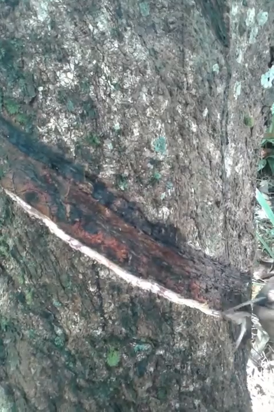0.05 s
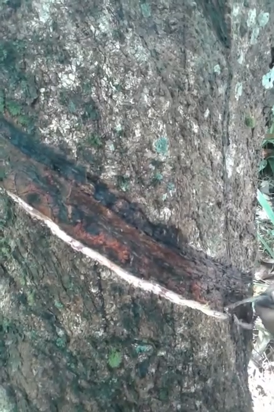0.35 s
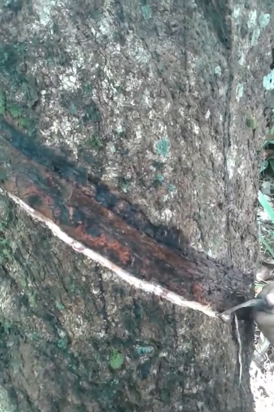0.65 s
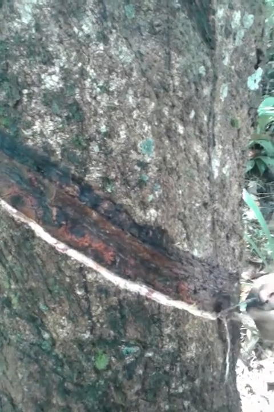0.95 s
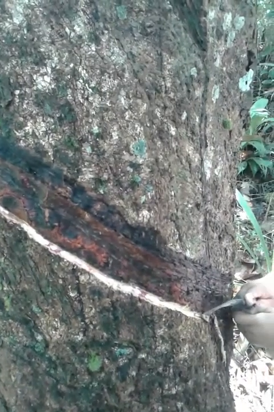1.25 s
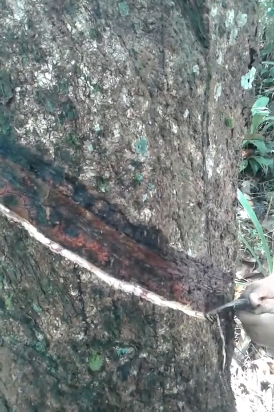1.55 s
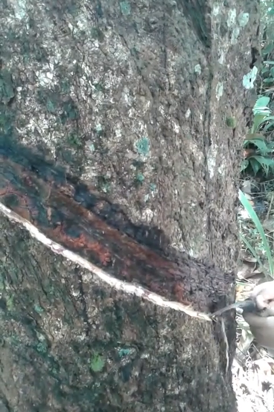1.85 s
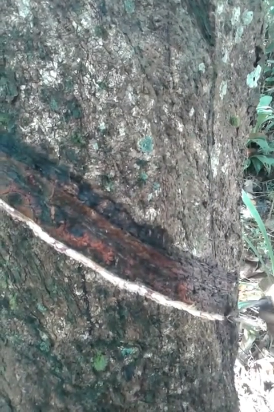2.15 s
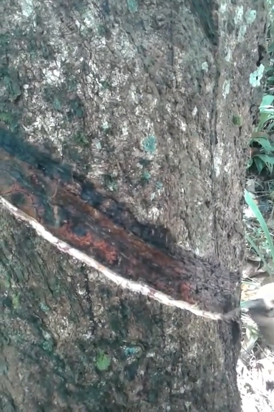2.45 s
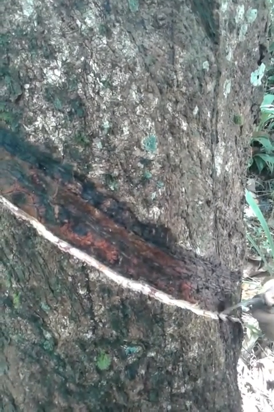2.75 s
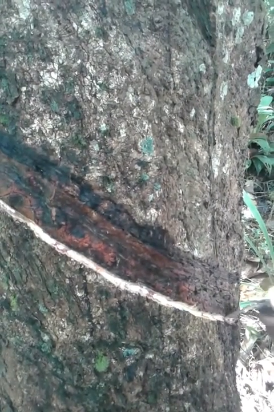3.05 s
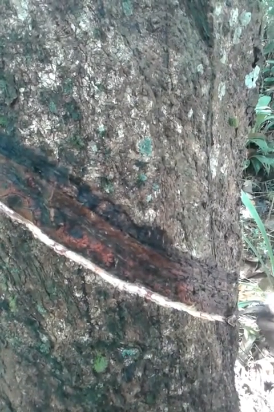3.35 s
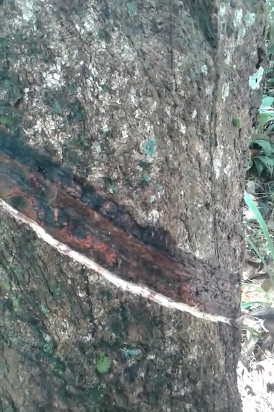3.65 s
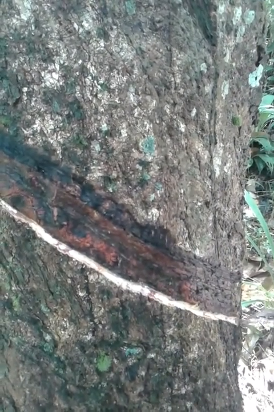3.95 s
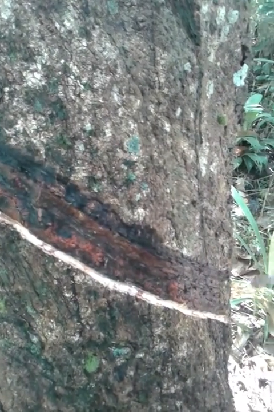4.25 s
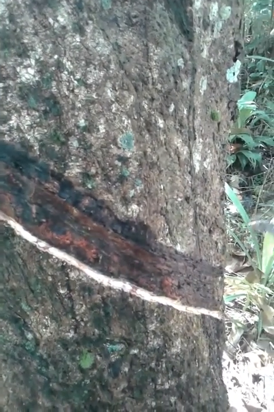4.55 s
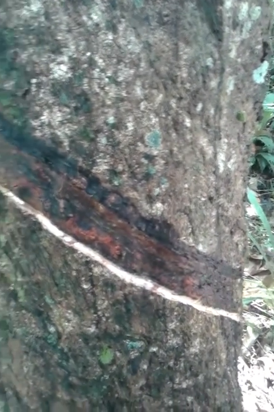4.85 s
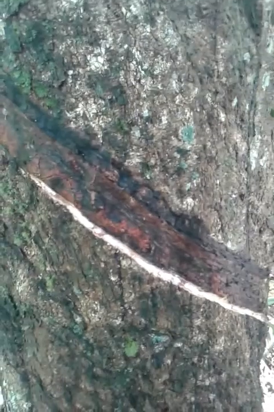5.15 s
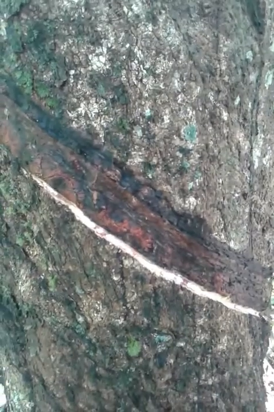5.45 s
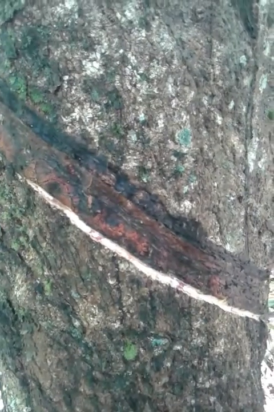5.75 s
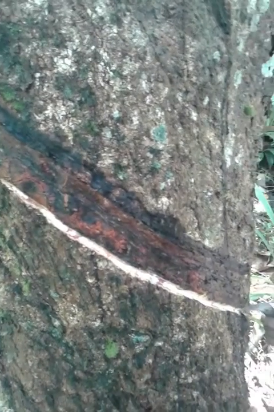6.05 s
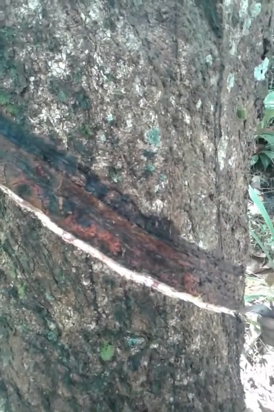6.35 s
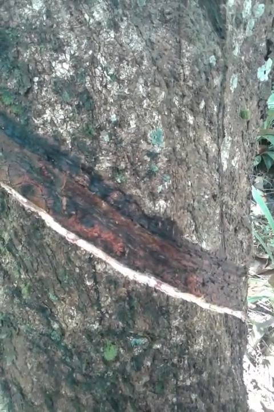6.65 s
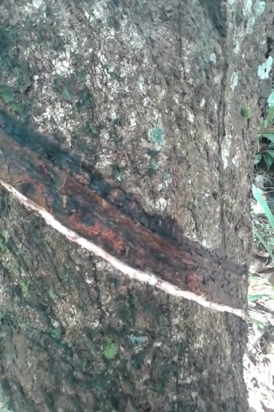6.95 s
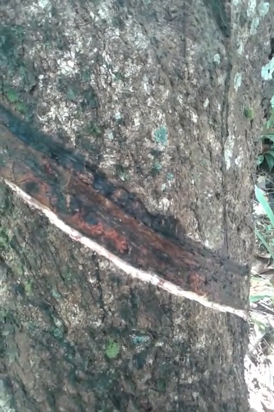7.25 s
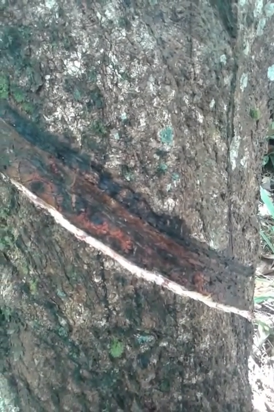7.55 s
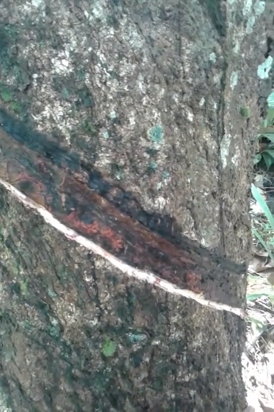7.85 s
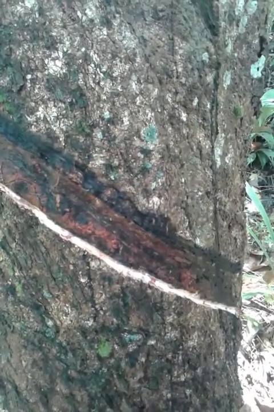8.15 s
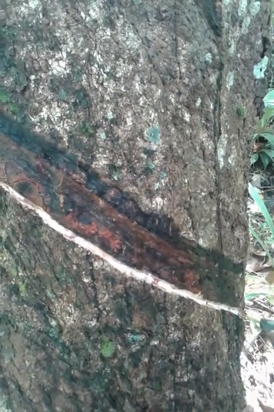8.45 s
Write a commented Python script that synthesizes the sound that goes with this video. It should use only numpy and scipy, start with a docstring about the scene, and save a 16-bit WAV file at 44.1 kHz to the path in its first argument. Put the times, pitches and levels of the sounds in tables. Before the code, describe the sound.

In the woods, a high cicada buzz runs behind the close sound of a knife cutting into bark. Quick, irregular scrapes and sharp little clicks follow each other for about four seconds, stop, then resume for a few more strokes. Dry leaves crackle briefly, a nearer insect trills twice, and tiny chirps and a distant whistled note come and go.

```python
"""In the woods, microphone close to a tree. Cicadas buzz over a low rush of air; a far whistler
repeats a falling note. Almost at once a hooked knife starts shaving a groove in the bark, each short
stroke a run of tiny fibre breaks that ring the blade. Chips snap off, something small chirps, feet shift
in dry leaves. An insect trills at about 1 s and again at 5 s; now and then a hand bumps the camera.
Throughout, the recorder's noise suppressor turns the chorus down whenever nothing stands out of it."""
import sys
import numpy as np
from scipy import signal
from scipy.fft import rfft, irfft, next_fast_len
from scipy.io import wavfile
from scipy.ndimage import uniform_filter1d, minimum_filter1d

SR = 44100
rng = np.random.default_rng(int(sys.argv[2]) if len(sys.argv) > 2 else 0)


def log_audio(samples):
    """Write samples as a 16-bit WAV file to the path given in sys.argv[1]."""
    # one column per channel
    frames = np.atleast_2d(samples).T
    # limit to full scale, then quantise
    limited = np.clip(frames, -1, 1)
    pcm = np.round(limited * 32767).astype(np.int16)
    wavfile.write(sys.argv[1], SR, pcm)


N = 379689
TIME = np.arange(N) / SR


def gain_of(db):
    """Decibels to amplitude."""
    return 10 ** (np.asarray(db) / 20)


def unit_rms(x):
    """Scales to rms 1."""
    return x / np.sqrt(np.mean(x ** 2) + 1e-20)


def db_at(spectrum, hz):
    """Level at the given frequencies, from rows of (frequency [Hz], level [dB])."""
    f, db = np.transpose(spectrum)
    return np.interp(np.log(hz + 1), np.log(f + 1), db)


def envelope(rows):
    """Gain from rows of (time [s], level [dB]); silent outside them."""
    s, db = np.transpose(rows)
    return gain_of(np.interp(TIME, s, db)) * (TIME >= s[0]) * (TIME <= s[-1])


def add(mix, start_s, sound):
    """Lays a sound into the mix."""
    part = mix[max(round(start_s * SR), 0):][:len(sound)]
    part += sound[:len(part)]


def colour(x, db):
    """Causal filter with the given gain in each bin, so that clicks ring only afterwards."""
    cepstrum = irfft(np.log(gain_of(db)), len(x))
    cepstrum[1:(len(x) + 1) // 2] *= 2
    cepstrum[len(x) // 2 + 1:] = 0
    return irfft(rfft(x) * np.exp(rfft(cepstrum)), len(x))


def hiss(spectrum):
    """Smooth noise of a given spectrum, at rms 1."""
    size = next_fast_len(N)
    gains = gain_of(db_at(spectrum, np.fft.rfftfreq(size, 1 / SR)))
    return unit_rms(irfft(rfft(rng.standard_normal(size)) * gains, size)[:N])


def ring(x, body_db, size=2048):
    """Sends x through a body whose gain is the function body_db(Hz); returns rms 1."""
    response = colour(signal.unit_impulse(size), body_db(np.fft.rfftfreq(size, 1 / SR)))
    return unit_rms(signal.oaconvolve(x, response)[:len(x)])


def mode_power(modes, hz):
    """Summed power of a set of resonances."""
    return sum(gain_of(db) ** 2 / (1 + (2 * (hz - f) / width) ** 2) for f, width, db in modes)


def resonate(x, hz, width_hz):
    """A resonance of gain 1 that follows the curve hz."""
    turn = np.exp(2j * np.pi * np.cumsum(hz) / SR)
    pole = np.exp(-np.pi * width_hz / SR)
    return 2 * (turn * signal.lfilter([1 - pole], [1, -pole], x / turn)).real


def wander(per_s):
    """A random drifting curve of rms 1."""
    knots = rng.standard_normal(N // 16)
    return unit_rms(np.interp(TIME * per_s, np.arange(len(knots)), knots))


def crackle(per_s, spread_db, smooth):
    """Tiny breaks of random size over a share of smooth friction."""
    sizes = gain_of(spread_db * np.minimum(rng.exponential(1, N), 4)) * rng.choice([-1, 1], N)
    breaks = unit_rms(sizes * (rng.random(N) < per_s / SR))
    return unit_rms(breaks + smooth * rng.standard_normal(N))


def trunks(x, wet_db, t60_s):
    """Surrounding trunks scatter echoes back to the microphone."""
    t = np.arange(SR // 3) / SR
    echoes = rng.standard_normal(len(t)) * (rng.random(len(t)) < 2000 / SR)
    echoes *= (t > .006) * gain_of(-60 * t / t60_s)
    return x + gain_of(wet_db) * signal.oaconvolve(x, echoes / np.linalg.norm(echoes))[:N]


def cicadas(buzz_db=-1, sizzle_db=-0.5, foliage_db=-5.5, flutter_db=1.0, patchy_db=2.3):
    """Many far tymbals merge into a band and its octave, over a thin hiss of foliage."""
    # slow drift of the chorus: (time [s], level [dB])
    drift = [(0, -59.5), (1.3, -58.5), (2.2, -58.5), (3.5, -60), (4.4, -61.5), (5.2, -63), (6.6, -61.5),
             (7.8, -61.5), (8.6, -59.5)]
    # spectra of the band, its octave and the foliage: (frequency [Hz], level [dB])
    buzz = [(2800, -36.5), (3400, -11), (3750, 3), (4050, 1.5), (4450, 3.5), (4900, -18), (5700, -17.5),
            (7000, -39)]
    sizzle = [(4800, -30.5), (6000, -18), (6900, -7), (7500, -2.5), (8200, 3), (8650, -5), (9200, -14.5),
              (11000, -18), (16000, -36)]
    foliage_colour = [(300, -12.5), (700, -8), (1200, -6.5), (1900, -5.5), (2600, 2.5), (3200, -7),
                      (5500, 2.5), (10000, -4.5), (13000, -3), (16000, -5)]
    foliage = ring(crackle(per_s=330, spread_db=-3.5, smooth=2.2), lambda hz: db_at(foliage_colour, hz))
    tymbals = gain_of(buzz_db) * hiss(buzz) + gain_of(sizzle_db) * hiss(sizzle)
    bands = signal.stft(tymbals, nperseg=256)[2]
    patches = uniform_filter1d(rng.standard_normal(bands.shape), size=3, axis=0)
    patches = unit_rms(uniform_filter1d(patches, size=10, axis=1))  # single callers come and go
    callers = signal.istft(bands * unit_rms(gain_of(patchy_db * patches)), nperseg=256)[1][:N]
    chorus_db = np.interp(TIME, *np.transpose(drift)) + flutter_db * wander(per_s=67)
    return gain_of(chorus_db) * (callers + gain_of(foliage_db) * foliage)


def far_air(trim_db=3):
    """A low rush of air, far off in the woods."""
    # its swells: (time [s], level [dB])
    swells = [(0, -82), (1.15, -77), (1.5, -89), (2.6, -83), (3.25, -70), (3.65, -83), (4.45, -71.5),
              (5.15, -82.5), (5.42, -73.5), (5.75, -92), (6.15, -79), (6.6, -85), (7.1, -75.5),
              (7.7, -72.5), (7.92, -77.5), (8.6, -78)]
    # its spectrum: (frequency [Hz], level [dB])
    air_colour = [(20, -5), (60, -30), (150, -17), (265, -7.5), (335, 1.5), (450, -7), (900, -12.5),
                  (2000, -14.5), (5000, -26.5)]
    return gain_of(np.interp(TIME, *np.transpose(swells)) + trim_db) * hiss(air_colour)


def whistler(trim_db=-3, waver_hz=16, flicker_db=2.0, sag_hz_per_s=200):
    """Far sagging notes, growing lower and sparser, blurred by many paths through the trees."""
    # whistled notes: (start [s], length [s], level [dB], pitch at mid-note [Hz])
    notes = [(0.0, 0.035, -62, 4820), (0.098, 0.065, -54, 4660), (0.326, 0.06, -64.5, 4580),
             (0.388, 0.16, -69, 4350), (0.708, 0.06, -53, 4110), (1.118, 0.17, -61, 3940),
             (1.685, 0.33, -68, 3680), (2.6, .29, -66, 3590), (3.56, 0.32, -66.5, 3545),
             (4.62, 0.28, -70.5, 3590), (5.78, 0.35, -68.5, 3520), (6.95, 0.45, -70.5, 3510),
             (7.17, 0.05, -64, 3460), (8.38, 0.27, -66, 3490)]
    waver = waver_hz * wander(per_s=160)
    flicker = gain_of(flicker_db * wander(per_s=40))
    out = np.zeros(N)
    for start, length, db, mid_hz in notes:
        at = (TIME >= start) & (TIME < start + length)
        hz = mid_hz + waver[at] - sag_hz_per_s * (TIME[at] - start - length / 2)
        note = np.sin(2 * np.pi * np.cumsum(hz) / SR) * flicker[at]
        out[at] += gain_of(db + trim_db) * unit_rms(note * signal.windows.tukey(len(hz), .7))
    return trunks(out, wet_db=0.5, t60_s=0.59)


def knife(fade_db=22, judder_db=1.3, chatter_db=3.5, ripple_db=1.57, ripple_hz=170, shift_hz=59.6):
    """Close up, the edge catches and slips in fibres: fine breaks hiss, coarse ones ring blade and wood."""
    # strokes: (deepest bite [s], push before [s], ease after [s], level at the bite [dB], swell [dB],
    # bluntness [1 pointed, 3 flat], body against tearing [dB], main resonance [Hz], its height [dB])
    strokes = [(0.144, 0.048, 0.075, -40.5, 13, 1.2, -6.5, 2560, 14),
               (0.636, 0.045, 0.031, -49.5, 10, 0.82, -5.5, 2560, 16),
               (0.952, 0.059, 0.095, -42, 16, 1.64, -1.5, 2470, 14.5),
               (1.205, 0.012, 0.05, -54.5, 12, 1, -2, 2550, 22),
               (1.402, 0.044, 0.065, -42.5, 17, 2.1, -0.5, 2514, 20),
               (1.768, 0.049, 0.031, -37, 28.5, 0.94, -1, 2590, 20),
               (2.068, 0.013, 0.047, -46.5, 13, 1.1, -4.5, 2460, 17),
               (2.117, 0.018, 0.073, -36.5, 15, 1.4, -2, 2575, 15),
               (2.543, 0.054, 0.055, -40, 22.5, 1.85, 1, 2580, 15.5),
               (2.636, 0.0049, 0.026, -47.5, 12, 1.4, -11.5, 2320, 8),
               (2.83, 0.073, 0.25, -71, 15.5, 1.5, 10.5, 2570, 21),
               (2.918, 0.018, 0.068, -37.5, 17, 1.23, -3.5, 2500, 8.5),
               (3.285, 0.037, .035, -56.5, -1, 1.4, 3, 2630, 24),
               (3.331, 0.035, 0.046, -43.5, 16, 2.35, -2.5, 2560, 14.5),
               (3.654, 0.031, 0.053, -41, 23, 3, -4.5, 2680, 13),
               (4.005, 0.048, 0.064, -36.5, 25.5, 1.05, -4.5, 2570, 11),
               (5.61, 0.04, 0.04, -51, 19, 2.3, -3.5, 2300, 16),
               (5.648, 0.031, 0.052, -48.5, 13, 2.1, -2.5, 2570, 26),
               (5.984, 0.031, 0.034, -48.5, 9.5, 1.1, -3, 2680, 11.5),
               (6.273, 0.04, 0.045, -42, 21, 1.6, -3.5, 2650, 14),
               (6.556, 0.023, 0.045, -45, 3, 1.3, -6.5, 2540, 19),
               (6.579, 0.0098, 0.094, -38.5, 11, 1.46, -5, 2580, 14),
               (7.359, 0.016, 0.048, -56.5, 7, 1.4, -5, 2900, 12)]
    # spectra of the tearing fibres and the blade's body: (frequency [Hz], level [dB])
    tear = [(2500, -27.5), (3400, -8.5), (4300, -6.5), (5000, -3.5), (6100, -2.5), (7300, -1.5), (8700, -1),
            (9800, -5.5), (11500, -8.5), (13000, -17), (16000, -21)]
    body = [(30, -28), (120, -19), (380, -10.5), (600, -14), (900, -15.5), (1400, -5.5), (1600, -16.5),
            (2100, -3), (2900, -3), (3350, -10), (4500, -18.5)]
    # the blade's other resonances: (frequency [Hz], width [Hz], height [dB])
    blade = [(1160, 55, 12), (1790, 74, 8), (3150, 170, -1), (4030, 260, 8), (4570, 54, 4), (5950, 590, 8),
             (6600, 88, 5), (8670, 750, 1.5), (10500, 220, -3)]
    slip = wander(per_s=330)
    shift = shift_hz * wander(per_s=65)  # the main resonance moves as the edge shifts in the cut
    fine = crackle(per_s=7000, spread_db=2.0, smooth=0.23) * gain_of(judder_db * slip)
    coarse = crackle(per_s=900, spread_db=0.95, smooth=0.23) * gain_of(chatter_db * slip) + .5 * fine
    out = np.zeros(N)
    for bite, push_s, ease_s, db, swell_db, bluntness, body_db, main_hz, main_db in strokes:
        start = bite - push_s
        at = slice(round(start * SR), round((bite + ease_s) * SR))
        t = TIME[at] - bite
        below_bite_db = np.where(t < 0, swell_db * abs(t / push_s) ** bluntness,
                                 fade_db * abs(t / ease_s) ** bluntness)
        grip = 1 + 0.026 * rng.standard_normal()  # each stroke detunes the other resonances a little
        modes = [(f * grip, width, height) for f, width, height in blade]
        ripple = ripple_db * rng.standard_normal(size=200)  # each spot of bark has its own colour
        bark_db = lambda hz: np.interp(hz / ripple_hz, np.arange(len(ripple)), ripple)
        blade_db = lambda hz: 10 * np.log10(1 + mode_power(modes, hz))
        for breaks, spectrum, part_db in (fine, tear, 0), (coarse, body, body_db):
            scrape = ring(breaks[at], lambda hz: db_at(spectrum, hz) + blade_db(hz) + bark_db(hz))
            scrape += (gain_of(main_db) - 1) * resonate(scrape, main_hz + shift[at], width_hz=150)
            add(out, start, gain_of(db + part_db - below_bite_db) * unit_rms(scrape))
    return out


def snaps(trim_db=1.5, crack_s=.0021, crumble_s=0.017, crumble_db=-19, knock_db=3, treble_db=8,
          lag_s=.0015, rise_s=0.00042, ring_width_hz=170, size=4096):
    """A nearby chip breaks in a few milliseconds and rings briefly at its own pitch; crumbs follow."""
    # chips and twigs: (time [s], level [dB], low knock [dB], treble [dB], ring [Hz], ring height [dB])
    chips = [(0.133, -35.5, -14, 6, 8900, 14), (0.136, -42, -12, 1, 6000, 3),
             (0.156, -35, -7.5, -15, 2320, 9), (0.168, -43, -25, 4, 10500, 12),
             (0.212, -35, -22.5, -14.5, 2230, 0), (0.42, -54.5, -5, -30, 915, 0),
             (0.465, -45.5, -7.5, -24, 2600, 8.5), (0.517, -43.5, -1, -16.5, 2470, 11),
             (0.988, -35.5, -26, -14, 2550, 11), (1.327, -35, -7.5, -17.5, 1480, 2.5),
             (1.336, -38, 0, -15, 380, 4), (1.438, -41, -23, -8, 6460, 6), (1.738, -48, -25, -5, 2520, 12),
             (1.762, -34, -32, -6, 6200, 12), (2.109, -32.5, -30, 1, 6000, 10),
             (2.114, -33, -20, -1, 6100, 10), (2.125, -38, -25, 0, 8700, 12),
             (2.137, -39, -18, 3, 10500, 7), (2.296, -37, -14.5, -13.5, 6130, -3),
             (2.508, -39, -18, -10, 2550, 14), (2.624, -41, -13.5, -17.5, 3860, 4),
             (2.866, -52.5, 0, -6, 756, 4), (2.931, -36, -16, -3, 8800, 2), (3.243, -42, -9, -20, 3960, 8),
             (3.998, -32.5, -8, -6, 6100, 15), (4.27, -45, -13, -31, 900, 6),
             (4.323, -44, -11, -25, 2410, 14), (4.476, -41, -8, -21, 393, 14),
             (5.106, -47, -18, -12, 1340, 14), (6.571, -38.5, -11, -11, 6700, 13),
             (6.647, -35.5, -24, -17.5, 8300, 6), (6.858, -40, -2.5, -18, 2520, 16),
             (6.869, -40.5, -5, -16, 2520, 13.5), (6.987, -46, -14, -17, 2580, 3),
             (7.404, -55.5, -13, -29, 2340, 5), (7.54, -33, -15.5, -19, 2280, -3),
             (7.576, -47, -11, -2, 7500, 17), (7.588, -47.5, -10, -11, 1430, 16),
             (8.138, -49, -23, -19.5, 1750, 13), (8.239, -55.5, -10, -24, 1400, 9),
             (8.287, -39, -15, -5, 2380, 14), (8.347, -39, -29, -23, 7600, 11)]
    # spectrum common to all snaps: (frequency [Hz], level [dB])
    snap_colour = [(40, -42), (150, -15.5), (350, 5.5), (800, 7), (1500, 1), (2600, 0), (3300, -3),
                   (5500, 4.5), (8500, 7.5), (11000, 0.5), (16000, -11)]
    t = np.arange(size) / SR
    hz = np.fft.rfftfreq(size, 1 / SR)
    knock_share = db_at([(900, 0.95), (2400, 0.009)], hz)
    treble_share = db_at([(3500, 0.087), (7000, 0.91)], hz)
    attack = 1 - np.exp(-t / rise_s)
    decay = np.exp(-t / crack_s) + gain_of(crumble_db) * np.exp(-t / crumble_s)
    out = np.zeros(N)
    for start, db, low_db, high_db, ring_hz, ring_db in chips:
        burst = rng.standard_normal(size) * attack * decay
        wood_db = 10 * np.log10(0.5 + mode_power([(ring_hz, ring_width_hz, ring_db)], hz))
        tilt_db = knock_share * (low_db + knock_db) + treble_share * (high_db + treble_db)
        snap = colour(burst, db_at(snap_colour, hz) + wood_db + tilt_db)
        strength = np.sqrt(np.sum(snap ** 2) / (crack_s * SR))
        add(out, start + lag_s, gain_of(db + trim_db) * snap / strength)
    return out


def chirps(length_s=.017, top_hz=8550, drop_hz=3800, scatter=0.022, rasp_hz=260):
    """Tiny high calls, perhaps a small bird's, swoop down and linger among the trees."""
    # calls: (time [s], level [dB])
    calls = [(0.3, -49), (0.502, -47.5), (0.6, -50), (0.791, -51), (1.162, -48), (1.297, -50), (1.979, -49),
             (3.102, -52), (3.183, -50), (3.527, -54), (3.78, -56), (3.909, -47.5), (4.187, -50),
             (4.338, -49), (4.72, -55), (5.808, -52), (6.47, -47), (6.765, -53.5), (8.002, -53.5),
             (8.162, -52), (8.444, -50), (8.571, -50.5)]
    rasp = rasp_hz * wander(per_s=1800)
    out = np.zeros(N)
    for start, db in calls:
        at = (TIME >= start) & (TIME < start + length_s)
        age = (TIME[at] - start) / length_s
        hz = top_hz * (1 + scatter * rng.standard_normal()) - drop_hz * age ** 2 + rasp[at]
        swell = np.sin(np.pi * np.sqrt(age)) ** 2
        out[at] += gain_of(db) * swell * np.sin(2 * np.pi * np.cumsum(hz) / SR)
    return trunks(out, wet_db=2.5, t60_s=0.11)


def dry_leaves(trim_db=1):
    """Dry leaves crackle by the tree as the worker's feet and sleeves shift."""
    # movements, one list each: (time [s], level [dB])
    moves = [
        [(0.31, -80), (0.6, -66)],
        [(3.04, -71), (3.18, -69), (3.25, -62)],
        [(4.27, -56), (4.378, -74), (4.512, -46.5), (4.65, -72.5), (4.88, -68)],
        [(8.28, -58), (8.35, -49.5), (8.39, -66)],
    ]
    # spectrum of the leaves: (frequency [Hz], level [dB])
    leaf_colour = [(40, -23), (120, -12.5), (250, -10.5), (400, -2), (750, -3.5), (1300, 0), (2400, 0.5),
                   (3300, -3), (5000, -7), (8000, -2), (11000, -10.5), (16000, -22)]
    leaves = ring(crackle(per_s=3500, spread_db=2.3, smooth=0.43), lambda hz: db_at(leaf_colour, hz))
    return gain_of(trim_db) * leaves * sum(envelope(move) for move in moves)


def trill(pitch_hz=6753, waver_hz=16, throb_db=2, rasp=0.66, rise_s=0.068, fall_s=0.089, sag_db_per_s=3.5):
    """An insect nearer than the chorus: a narrow, rasping tone that throbs and tires through each bout."""
    # bouts of trilling: (start [s], length [s], level [dB])
    bouts = [(1.09, 0.941, -54.5), (5.11, 1.08, -57.5)]
    cycles = np.cumsum(pitch_hz + waver_hz * wander(per_s=320)) / SR
    roughness = 1 + rasp * (wander(per_s=280) + 1j * wander(per_s=110))
    throb = gain_of(throb_db * wander(per_s=130))
    tone = unit_rms((np.exp(2j * np.pi * cycles) * roughness * throb).real)
    out = np.zeros(N)
    for start, length, db in bouts:
        t = TIME - start
        fade = np.clip(np.minimum(t / rise_s, (length - t) / fall_s), 0, 1)
        out += fade * gain_of(db - sag_db_per_s * t) * tone
    return out


def hand_bumps():
    """Handling noise: fingers push on the camera's case, which answers with its low resonances."""
    # soft pushes: (time [s], level [dB], length [s])
    pushes = [(1.324, -57, 0.024), (2.776, -52, 0.068), (7.014, -54.5, 0.037), (7.535, -60, 0.015)]
    # resonances of the case: (frequency [Hz], width [Hz], height [dB])
    case = [(216, 13, 3), (336, 41, 11), (380, 80, -8)]
    tilt = [(80, -11), (150, 2.5), (220, 12), (450, -3), (1500, 9)]  # (frequency [Hz], level [dB])
    thud = ring(rng.standard_normal(N), lambda hz: 10 * np.log10(mode_power(case, hz)) + db_at(tilt, hz))
    out = np.zeros(N)
    for start, db, length in pushes:
        push = thud[round(start * SR):][:round(length * SR)]
        add(out, start, gain_of(db) * unit_rms(push * signal.windows.tukey(len(push), .6)))
    return out


def rub():
    """Near the end, something close by rubs once, light and dull."""
    # its swell: (time [s], level [dB])
    swell = [(6.95, -68), (7.03, -63), (7.05, -49), (7.15, -67), (7.28, -74)]
    # its spectrum: (frequency [Hz], level [dB])
    rub_colour = [(500, -18), (1200, -15), (1550, -1.5), (2300, -1), (2650, 10.5), (3100, -34), (5000, -37)]
    return envelope(swell) * hiss(rub_colour)


def suppressor(x, depth_db=9.0, threshold_db=5, knee_db=7.5, release_db_per_s=100):
    """Opens at once when any band stands out of its steady level, and sinks back in the pauses."""
    hz, t, bands = signal.stft(x, SR, nperseg=256)
    power = uniform_filter1d(abs(bands[(hz > 1000) & (hz < 15000)]) ** 2, size=3, axis=0)
    band_db = 10 * np.log10(abs(uniform_filter1d(power, size=9, axis=1, origin=2)) + 1e-20)
    band_db -= np.percentile(band_db, 30, axis=1, keepdims=True)  # against each band's own floor
    background_db = uniform_filter1d(minimum_filter1d(band_db.mean(0), size=500), size=500)
    excess_db = (band_db - background_db).max(0)
    open_db = depth_db * np.clip((excess_db - threshold_db) / knee_db, 0, 1)
    sink_db = release_db_per_s * t
    held_db = np.maximum.accumulate(open_db + sink_db) - sink_db
    return x * gain_of(np.interp(TIME, t, held_db) - depth_db)


def scene():
    """One microphone: the work at the tree up close, the insects and the woods behind it."""
    work = trunks(knife() + snaps() + dry_leaves() + rub(), wet_db=-19, t60_s=0.062)
    return (work + hand_bumps() + cicadas() + chirps() + trill() + whistler() + far_air())[None]


def record(dry):
    """The recorder's noise suppressor, then its band limit."""
    lowpass = signal.firwin(511, cutoff=15950, window=("kaiser", 9), fs=SR)
    return signal.oaconvolve(suppressor(dry[0]), lowpass, "same")[None]


dry = scene()
out = record(dry)
log_audio(out)
```